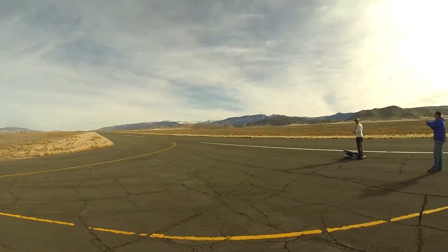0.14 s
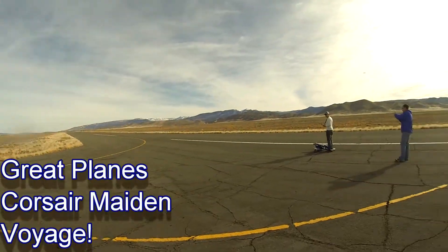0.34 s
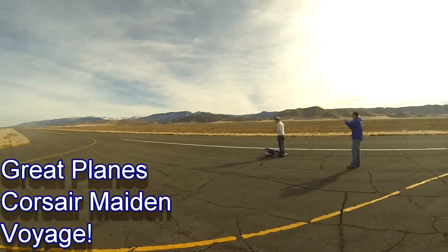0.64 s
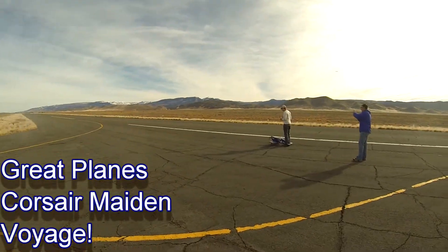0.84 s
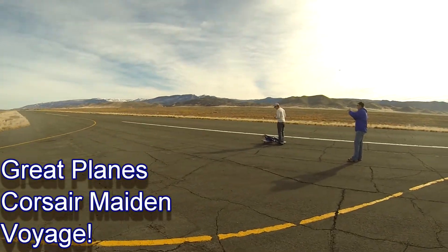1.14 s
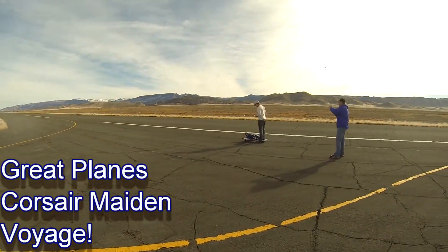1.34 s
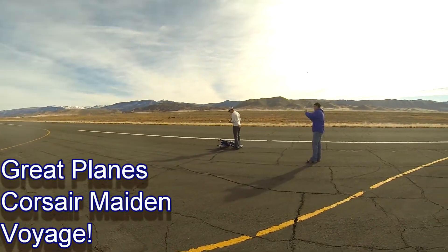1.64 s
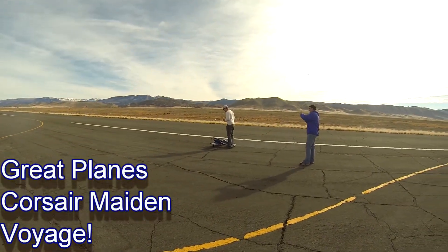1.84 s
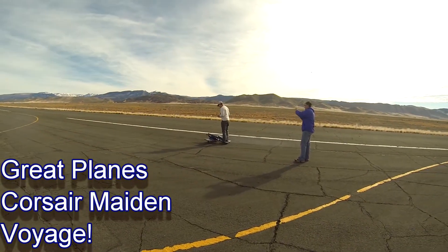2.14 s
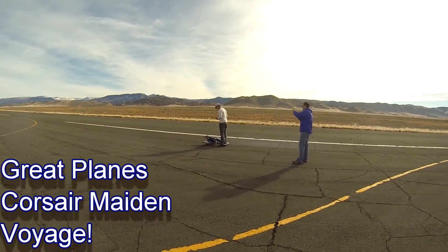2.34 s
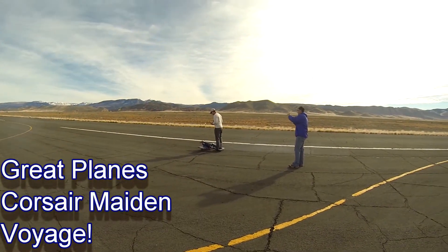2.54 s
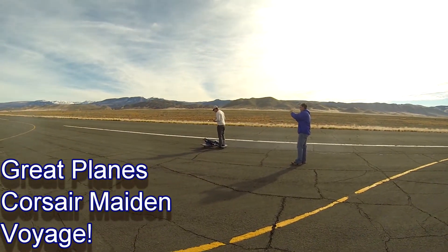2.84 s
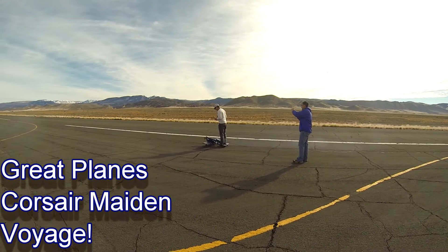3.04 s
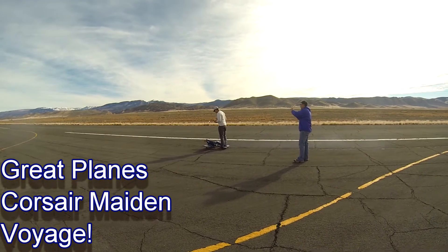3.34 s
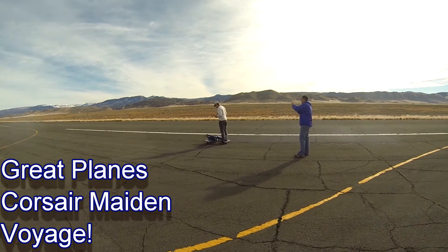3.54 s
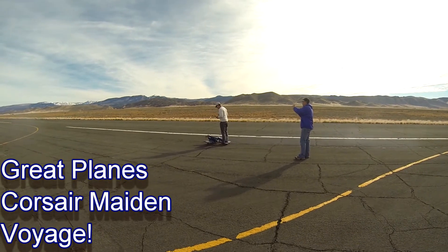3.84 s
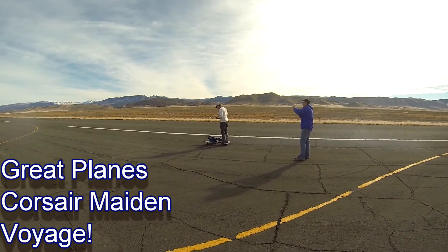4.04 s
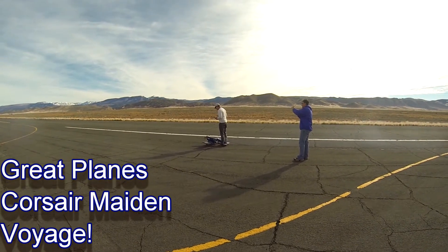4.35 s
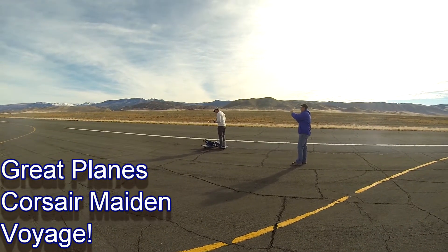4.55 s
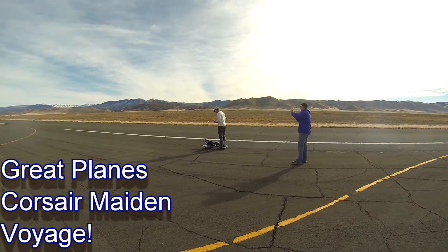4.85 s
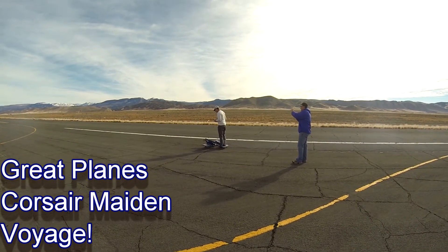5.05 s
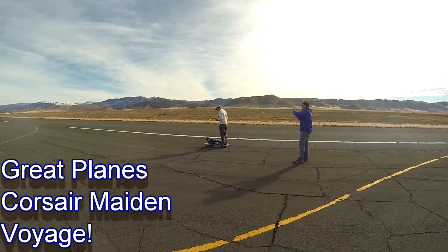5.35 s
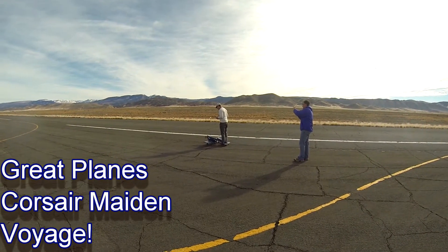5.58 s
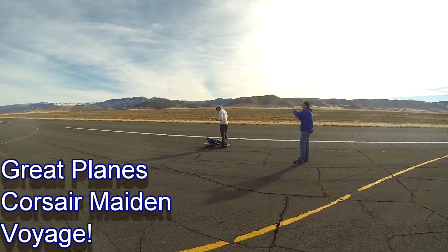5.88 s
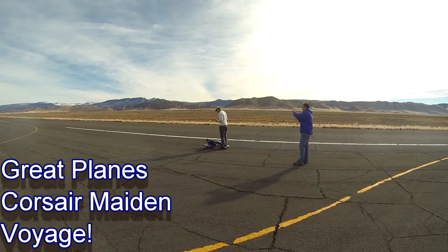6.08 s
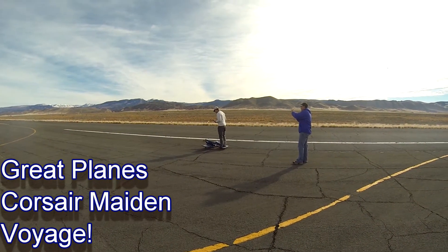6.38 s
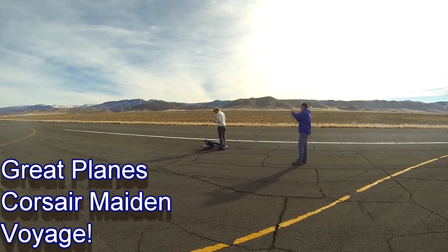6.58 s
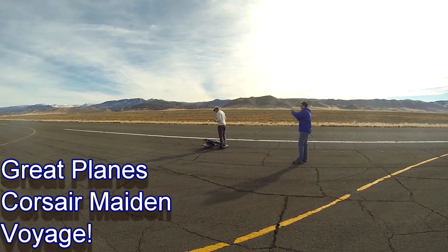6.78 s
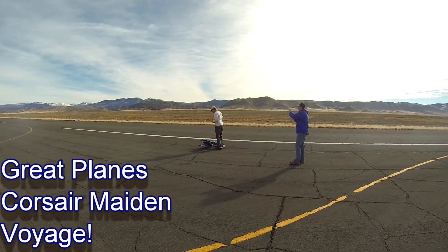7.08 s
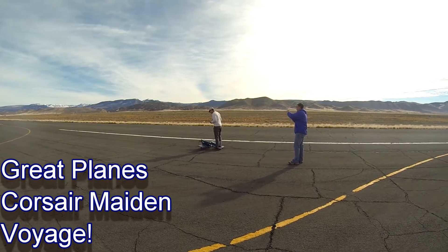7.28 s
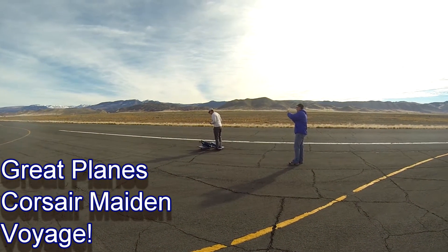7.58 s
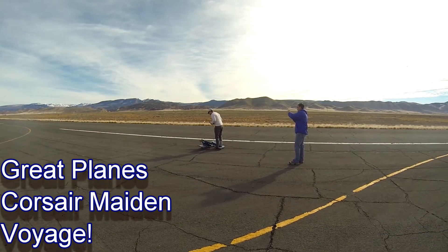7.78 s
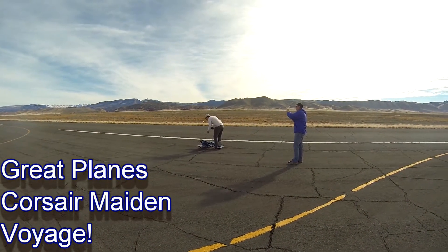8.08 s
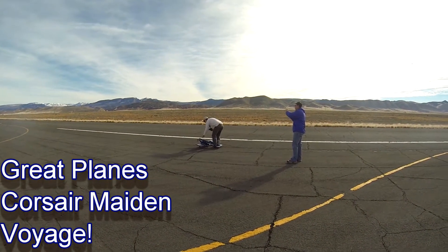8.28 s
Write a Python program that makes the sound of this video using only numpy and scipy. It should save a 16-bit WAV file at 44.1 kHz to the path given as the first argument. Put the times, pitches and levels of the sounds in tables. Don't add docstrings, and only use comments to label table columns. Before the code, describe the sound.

After a brief silence, a small two-stroke model airplane engine revs up, stutters, holds a loud buzzing full throttle, then drops to a lumpy, popping idle outdoors.

```python
import sys
import numpy as np
from scipy import signal
from scipy.fft import rfft, irfft, next_fast_len
from scipy.io import wavfile
from scipy.ndimage import uniform_filter1d, map_coordinates

SR = 44100
rng = np.random.default_rng(int(sys.argv[2]) if len(sys.argv) > 2 else 0)


def wav_out(sig):
    wavfile.write(sys.argv[1], SR, np.round(np.clip(np.atleast_2d(sig).T, -1, 1) * 32767).astype(np.int16))


def decibels_to_gain(level_db):
    exponent = np.asarray(level_db, float) / 20
    return 10 ** exponent


N = 371322
START_S = .4126

# t/s, miss chance after a firing [0-1], miss chance after a miss [0-1], gas noise share [0-1]
MIXTURE = [(.4, .1, 0, .5), (.9, .2, 0, .3), (1.0, .97, 0, .17), (1.45, .97, .05, .22), (1.55, .95, .3, .4),
           (1.72, .95, .2, .5), (1.76, .1, .3, .28), (1.92, .1, .1, .22), (1.95, .9, .1, .28),
           (2.08, .9, .1, .3), (2.12, .05, 0, .3), (2.9, .04, 0, .25), (3.1, 0, 0, .12), (6.2, 0, 0, .12),
           (6.4, .2, .2, .5), (6.6, 0, 0, .8), (6.8, 0, 0, .985), (8.5, 0, 0, .985)]
# f/Hz, response/dB
CLATTER_RESPONSE = [(3500, -16), (5000, -22), (6000, -7.5), (6400, -4.5), (6950, -4), (7400, -6), (7800, 8),
                    (8400, 8), (9200, -9), (10500, -30.5), (15500, -45.5)]


def unit(x):
    return x / np.sqrt(np.mean(x ** 2) + 1e-20)


def curves(rows):
    s, *cols = np.transpose(rows)
    return [np.interp(np.arange(N) / SR, s, c) for c in cols]


def against(speed_hz, rows):
    hz, *cols = np.transpose(rows)
    return [np.interp(speed_hz, hz, c) for c in cols]


def wobble(rate_hz, depth_db=None):
    knots = rng.standard_normal(int(N * rate_hz / SR) + 2)
    if depth_db is not None:
        knots = decibels_to_gain(depth_db * knots)
    return np.interp(np.arange(N) * (rate_hz / SR), np.arange(len(knots)), knots)


def coloured(x, points):
    hz, db = np.transpose(points)
    log_bins = np.log(np.fft.rfftfreq(4096, 1 / SR) + 1)
    cepstrum = irfft(np.log(decibels_to_gain(np.interp(log_bins, np.log(hz), db))))
    cepstrum[1:2048] *= 2
    cepstrum[2049:] = 0
    return signal.fftconvolve(x, irfft(np.exp(rfft(cepstrum))))[:N]


def resonant(x, *stages):
    size = next_fast_len(N + SR // 4)
    f, z = np.fft.rfftfreq(size, 1 / SR), rfft(x, size)
    for modes in stages:
        gain = 0
        for k, (hz, width, db) in enumerate(modes):
            gain = gain + (-1) ** k * decibels_to_gain(db) * 1j * f * width / (hz * hz - f * f + 1j * f * width)
        z = z * gain / (1 + 1j * f / (2 * modes[-1][0])) ** 4
    return irfft(z, size)[:N]


def pulses(times_s, sizes):
    at = np.asarray(times_s)[:, None] * SR
    taps = np.floor(at) + np.arange(-7, 9)
    shape = np.sinc(taps - at) * np.cos(np.pi * (taps - at) / 16) ** 2
    index = np.clip(taps, 0, N - 1).astype(int)
    return np.bincount(index.ravel(), (shape * np.c_[sizes]).ravel(), N)


def mix(clean, noise, share):
    return np.sqrt(1 - share) * clean + np.sqrt(share) * unit(noise)


def wind():
    # t/s, strength/dB
    gusts = [(0.45, -43), (1.22, -46), (3.35, -44), (3.7, -42.5), (3.77, -45), (3.84, -43.5), (4.39, -43),
             (6.54, -45.5), (6.56, -41), (7.38, -46), (7.84, -41.5), (8.4, -47)]
    # f/Hz, response/dB
    rumble = [(5, -69), (15, -9), (40, -7.5), (90, -15), (200, -13), (400, -12), (2000, -100.5)]
    noise = coloured(rng.standard_normal(N), rumble)
    return decibels_to_gain(curves(gusts)[0] + 7) * unit(decibels_to_gain(2.9 * wobble(14)) * noise)


def shaft_speed():
    # t/s, speed/Hz
    throttle = [(.42, 61.5), (.53, 63.2), (.84, 116), (1.09, 133.5), (1.26, 136), (1.56, 130.8),
                (1.75, 123), (1.92, 142.1), (2.2, 152), (2.4, 159.4), (3.18, 169), (3.5, 173),
                (6.23, 173.4), (6.3, 166), (6.53, 104.8), (6.7, 82), (7.0, 66.88), (7.42, 60.75)]
    # t of low point/s, depth/Hz, fall/s, recovery/s
    sags = [
        (1.62, 6, 0.066, 0.075),
        (2.09, 13, 0.12, 0.053),
        (2.8, 7.5, 0.21, 0.22),
        (3.63, 9, .13, 0.26),
        (4.4, 10, .14, 0.46),
        (4.81, 4, .16, .25),
        (5.392, 2, 0.063, 0.42),
        (7.639, -14, .22, .6),
    ]
    inertia_s = 0.031
    t = np.arange(N) / SR
    sag_hz = 0
    for s, depth_hz, fall_s, recovery_s in sags:
        fall = np.clip(1 + (t - s) / fall_s, 0, 1)
        sag_hz = sag_hz + depth_hz * fall * np.exp(-np.clip(t - s, 0, 9) / recovery_s)
    return uniform_filter1d(curves(throttle)[0] - sag_hz, int(inertia_s * SR))


def levels(steady_hz, law, coast_db, unsteady_db):
    full_coast_hz_per_s, wander_hz = 220, 6
    slowing = -uniform_filter1d(np.gradient(steady_hz) * SR, SR // 10)
    coast = np.clip(slowing / full_coast_hz_per_s, 0, 1)
    return [db + loss * coast + unsteady_db * wobble(wander_hz)
            for db, loss in zip(against(steady_hz, law), coast_db)]


def shaft_tones(steady_hz, turns):
    # speed/Hz, 1st/dB, 2nd/dB, 3rd/dB, 4th/dB
    tones = [(62, -56, -53, -35.5, -46), (68.6, -48, -50, -32, -51), (94.4, -38, -34.5, -42.5, -35),
             (124.4, -31, -25.5, -35.5, -66), (140.7, -29, -22, -51, -49), (152, -27.5, -16, -28, -19.5),
             (166.1, -28.5, -17, -21.5, -23.5), (168.8, -32, -15.5, -24.5, -30),
             (173, -34, -13.5, -19.5, -67)]
    coast_db = [-13, -1.5, -3, -1]
    out = 0
    for k, db in enumerate(levels(steady_hz, tones, coast_db, unsteady_db=0.98)):
        gain = np.sqrt(2) * decibels_to_gain(db + 0.37 * wobble(25))
        out = out + gain * np.sin(2 * np.pi * (k + 1) * turns + 1.03 * k * k)
    return out


def firings(times_s, chance):
    miss, again, _ = (c[(times_s * SR).astype(int)] for c in curves(MIXTURE))
    fired = np.ones(len(times_s), bool)
    for k in range(1, len(times_s)):
        fired[k] = chance[k] > (miss[k] if fired[k - 1] else again[k])
    return fired


def gas_noise(turns, noisy):
    gate = 1.5 - noisy + np.exp(-3.0 * (turns % 1))
    return unit(gate * rng.standard_normal(N))


def muffler_boom(puffs, turns, noisy):
    # f/Hz, width/Hz, level/dB
    can = [(833, 66, 0)]
    # f/Hz, width/Hz, level/dB
    gas_modes = [(594, 197, -1.5), (842, 210, 3)]
    hum = unit(resonant(puffs, can, [(774.0, 290, 0)]))
    return mix(hum, resonant(gas_noise(turns, noisy), gas_modes), np.clip(.1 + noisy ** 4, 0, 1))


def echoed(x):
    # delay/s, level/dB
    echoes = [(0, 17), (.0012, 4), (.0023, 18), (.0031, 20.5), (.0044, 11), (.0067, 13.5)]
    delay_s, db = np.transpose(echoes)
    train = pulses(delay_s + 0.00015, decibels_to_gain(db) * (-1) ** np.arange(len(db)))
    return signal.fftconvolve(x, train[:SR // 50])[:N]


def exhaust_bark(barks, turns, noisy, full):
    # f/Hz, response/dB
    response = [(120, -22.5), (400, -18), (800, 2.5), (1150, -5), (1650, 3), (1950, 1.5), (2200, -9.5),
                (2950, -11.5), (3200, -10.5), (3550, -13), (4250, -27), (4700, -22.5), (5400, -29.5),
                (7000, -51)]
    clean = mix(unit(coloured(barks, response)), howl(turns), 0.71 * full)
    return mix(clean, coloured(gas_noise(turns, noisy), response), np.clip(.03 + noisy, 0, .985))


def cylinder_tick(ticks, turns, noisy, full):
    # f/Hz, response/dB
    air = [(8000, -53), (9400, -4.5), (10000, -1), (10900, -9.5), (11600, -10), (12600, -16.5),
           (14000, -24), (15500, -28)]
    rebounds = np.roll(ticks, 75) + 0.56 * np.roll(ticks, 140)
    rattle = ticks + (0.64 + 0.28 * full) * rebounds
    clatter = mix(unit(rattle), gas_noise(turns, noisy), noisy ** 1.6)
    tick = unit(coloured(clatter, CLATTER_RESPONSE))
    tick = tick + decibels_to_gain(-20 + 9.9 * full) * unit(coloured(clatter, air))
    loose = (1 - full) * (1 - noisy)
    rasp = loose * unit(resonant(ticks, [(6000, 140, 0)], [(5850, 620, 0)]))
    ping = loose * unit(resonant(ticks, [(8050, 350, 0)], [(8100, 670, 0)]))
    return drifting(tick + decibels_to_gain(-7) * rasp + decibels_to_gain(-15) * ping, depth_db=1.5)


def drifting(x, depth_db):
    z = signal.stft(x, nperseg=256)[2]
    bins, frames = z.shape
    knots = rng.standard_normal((bins // 2 + 2, frames // 80 + 2))
    field = map_coordinates(knots, np.mgrid[:bins, :frames] / [[[2]], [[80]]], order=1)
    return signal.istft(z * decibels_to_gain(depth_db * field), nperseg=256)[1][:N]


def exhaust(steady_hz, speed_hz, turns):
    # speed/Hz, muffler boom/dB, exhaust bark/dB, cylinder tick/dB
    law = [(57, -34.5, -40.5, -70), (69.5, -32.5, -41.5, -69), (84.6, -30.5, -36, -62),
           (101, -27, -37, -60), (111, -26.5, -33, -57), (123, -19, -29, -51), (136, -15, -29.5, -47.5),
           (151.5, -13.5, -23.5, -44), (163.5, -21, -24.5, -48), (167.55, -17, -22, -44.5),
           (173, -22, -21.5, -46.5)]
    coast_db = [-1.5, -2, -8]
    boom_db, bark_db, tick_db = levels(steady_hz, law, coast_db, unsteady_db=2.25)
    _, again, noisy = curves(MIXTURE)
    full = np.clip((speed_hz - 146) / 16, 0, 1)

    times_s = np.interp(np.arange(1, int(turns[-1])), turns, np.arange(N) / SR)
    draw = rng.standard_normal((len(times_s), 4))
    fired = firings(times_s, rng.random(len(times_s)))
    even = 1 / np.sqrt(speed_hz[(times_s * SR).astype(int)])
    burn_s = times_s + 8e-6 * draw[:, 1]
    puffs = pulses(times_s, -even * decibels_to_gain(1.0 * draw[:, 0]) * np.where(fired, 1, .85))
    barks = echoed(pulses(burn_s, -even * decibels_to_gain(1.3 * draw[:, 2]) * np.where(fired, 1, .45)))
    ticks = pulses(burn_s, even * decibels_to_gain(1.64 * draw[:, 3]) * np.where(fired, 1.1, .15))

    boom = muffler_boom(puffs, turns, noisy)
    bark = exhaust_bark(barks, turns, noisy, full)
    tick = cylinder_tick(ticks, turns, noisy, full)
    stumble = resonant(pulses(times_s, 1.0 - fired), [(212, 270, 6.5), (630, 270, -1)])
    whistle = noisy ** 4 * unit(resonant(gas_noise(turns, noisy), [(3005, 110, 0)]))
    out = decibels_to_gain(boom_db - 1.5) * boom + decibels_to_gain(bark_db + 3.0) * bark
    out = out + decibels_to_gain(tick_db - 1.36 + 9 * again) * tick
    return out + decibels_to_gain(bark_db + 36.0) * (1 - 0.31 * full) * stumble + decibels_to_gain(bark_db - 9) * whistle


def knocks():
    # t/s, f/Hz, level/dB, t60/s, rise/s
    bumps = [
        (.415, 1600, -31, .02, .001),
        (.517, 336, -17, .11, .03),
        (.518, 1500, -38, .05, .003),
        (.46, 900, -32, .015, .0005),
        (.59, 2700, -40, .03, .003),
        (.845, 2800, -32, .02, .002),
        (1.4555, 11000, -27, .0006, .00002),
    ]
    out, t = np.zeros(N), np.arange(SR // 4) / SR
    for s, hz, db, t60_s, rise_s in bumps:
        envelope = decibels_to_gain(db - 60 * t / t60_s) * (1 - np.exp(-t / rise_s))
        out[round(s * SR):][:len(t)] += envelope * np.sin(2 * np.pi * hz * t)
    return out


def howl(turns):
    # multiple of firing rate [1], level/dB
    overtones = [(6, -16), (7, -16.5), (8, -17), (9, -17), (10, -14), (11, -9.5), (12, -22), (13, -54),
                 (14, -28), (15, -21.5), (16, -26.5), (17, -22.5), (18, -59), (19, -36.5), (20, -25.5),
                 (21, -28.5), (22, -37), (23, -34.5), (24, -41), (25, -35.5), (26, -44), (27, -50),
                 (28, -33), (29, -48.5), (30, -39), (31, -36)]
    return sum(decibels_to_gain(db) * wobble(7, depth_db=2.0) * np.sin(2 * np.pi * (k * turns + rng.random()))
               for k, db in overtones)


def prop_wash():
    # t/s, half length/s, level/dB
    puff = (2.83, 0.081, -40)
    # f/Hz, response/dB
    grit = [(2500, -32), (4200, 0), (5000, 1.5), (6000, -12), (10000, -12), (15500, -31)]
    s, half_s, db = puff
    swell = np.exp(-((np.arange(N) / SR - s) / half_s) ** 2)
    return decibels_to_gain(db) * swell * unit(coloured(rng.standard_normal(N), grit))


def idle_pops():
    # t/s, peak/dB, ring/dB
    pops = [(6.8129, -24.5, -54), (6.9237, -28, -58), (6.9973, -24.5, -60), (7.0572, -26, -61),
            (7.1475, -38, -66), (7.166, -28, -65), (7.2133, -27.5, -65), (7.2896, -28.5, -77),
            (7.3584, -26.5, -59), (7.4551, -27.5, -60), (7.4999, -26.5, -60), (7.5331, -23, -57),
            (7.5621, -24, -57), (7.5915, -25.5, -56), (7.6175, -25, -51), (7.6444, -27.5, -65),
            (7.6858, -24.5, -54), (7.7267, -25, -55), (7.768, -37, -64), (7.7814, -25, -55),
            (7.823, -24, -53), (7.8669, -28.5, -56), (7.9108, -27, -55), (7.9532, -28.5, -59),
            (8.013, -29, -62), (8.043, -27.5, -66), (8.132, -25, -55), (8.1928, -27.5, -63),
            (8.239, -24, -58), (8.3298, -29, -63)]
    # f/Hz, level/dB, t60/s, delay/s
    cowl = [(270, 2, .022, -.0003), (780, 0, .035, .0003), (1700, 3, .011, .0003), (3030, -17, .03, .0006)]
    lead_s, rise_s = .001, .0006
    s, db, ring_db = np.transpose(pops)
    body = 0
    for hz, mode_db, t60_s, delay_s in cowl:
        t = np.clip(np.arange(SR // 20) / SR - lead_s - delay_s, 0, 1)
        envelope = decibels_to_gain(mode_db - 60 * t / t60_s) * (1 - np.exp(-t / rise_s))
        body = body - envelope * np.sin(2 * np.pi * hz * t)
    thump = signal.fftconvolve(pulses(s - lead_s, decibels_to_gain(db + 2)), body)[:N]
    ring = resonant(pulses(s + 0.000983, decibels_to_gain(ring_db + 46.5)), [(4480, 82, 0), (5300, 360, -13)])
    tick = coloured(pulses(s + 0.000998, decibels_to_gain(ring_db + 14)), CLATTER_RESPONSE)
    return thump + ring + tick


def scene():
    fade_db, fade_s = -11, 0.81
    steady_hz = shaft_speed()
    speed_hz = steady_hz * (1 + 0.0019 * wobble(40))
    turns = np.cumsum(speed_hz) / SR
    fade = decibels_to_gain(fade_db * np.clip(1 - (np.arange(N) / SR - START_S) / fade_s, 0, 1))
    engine = shaft_tones(steady_hz, turns) + exhaust(steady_hz, speed_hz, turns) + idle_pops()
    return (fade * (wind() + engine) + knocks() + prop_wash())[None]


def low_pass(x):
    return signal.sosfilt(signal.butter(12, 15820, fs=SR, output="sos"), x)


def record(dry):
    t = np.arange(N) / SR
    hiss = decibels_to_gain(-72) * rng.standard_normal(N) * np.clip(t - .3, 0, 1)
    edge = signal.butter(12, 14800, fs=SR, output="sos")
    return low_pass(signal.sosfilt(edge, (dry + hiss) * (np.arange(N) > START_S * SR)))


dry = scene()
out = record(dry)
wav_out(out)
```